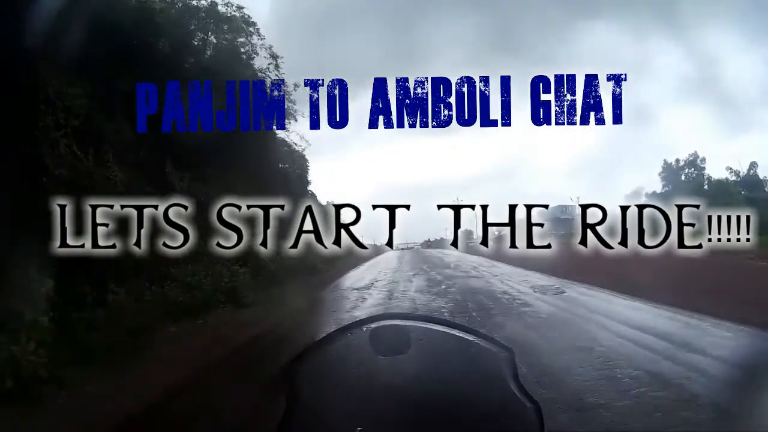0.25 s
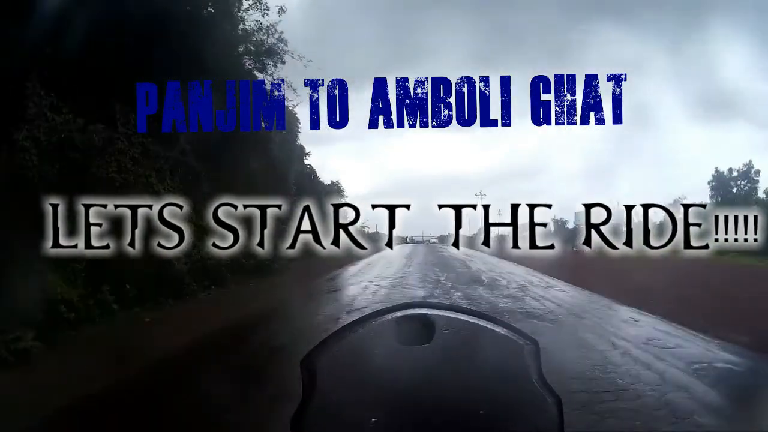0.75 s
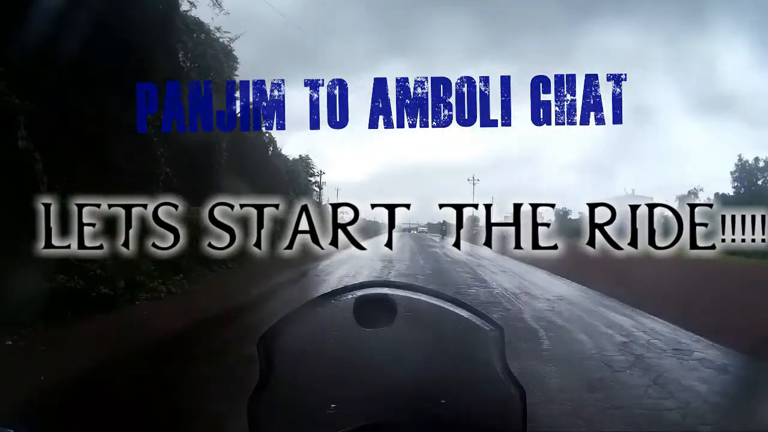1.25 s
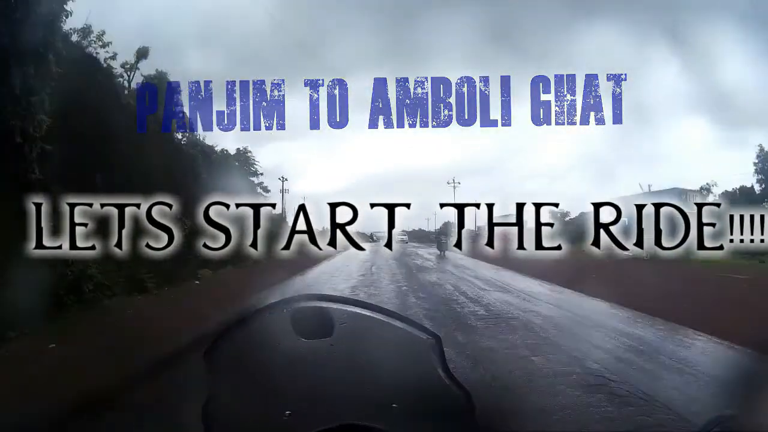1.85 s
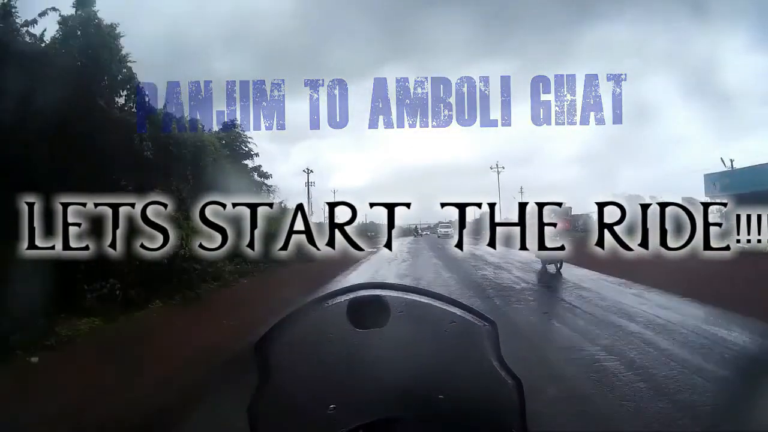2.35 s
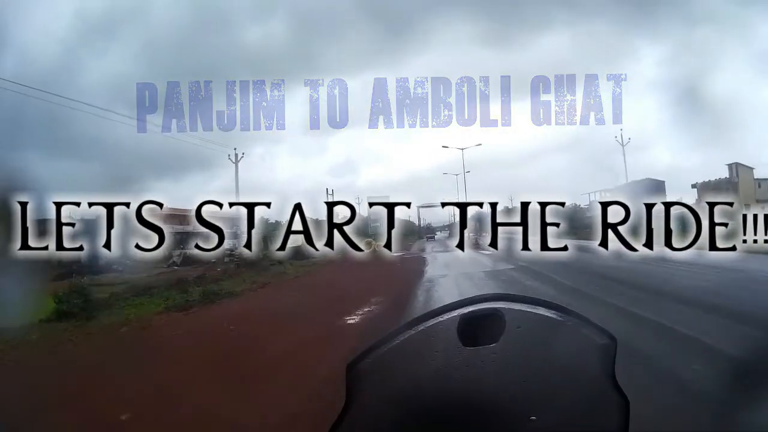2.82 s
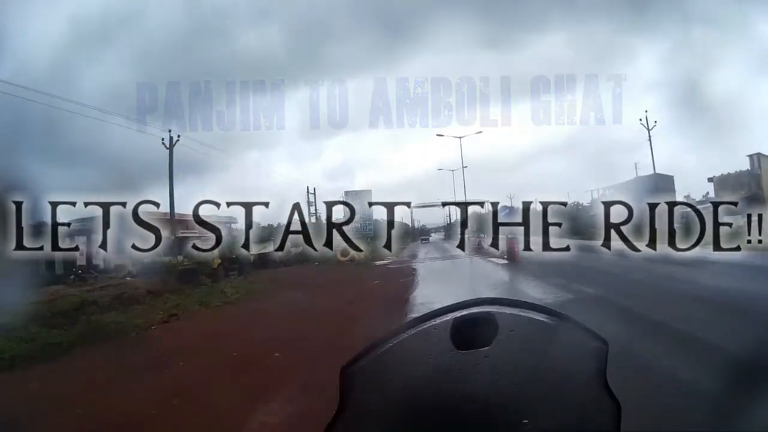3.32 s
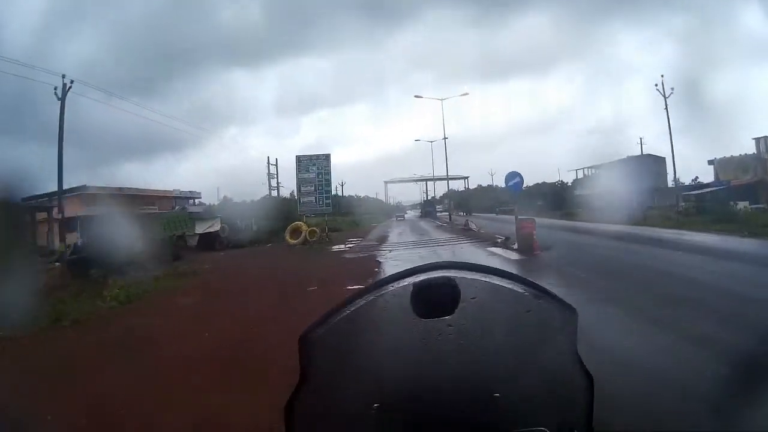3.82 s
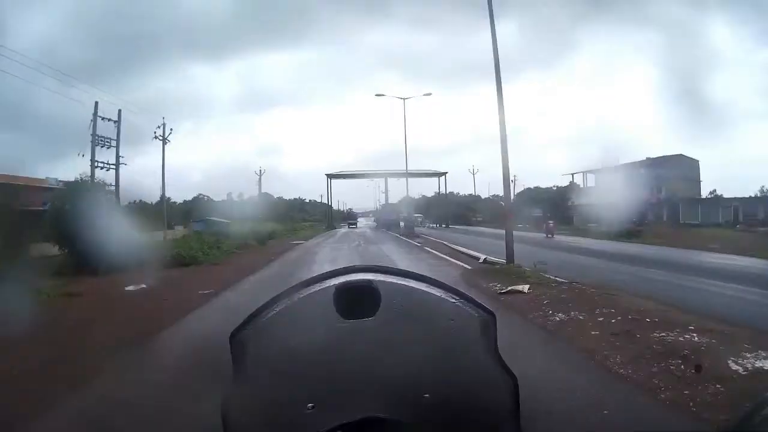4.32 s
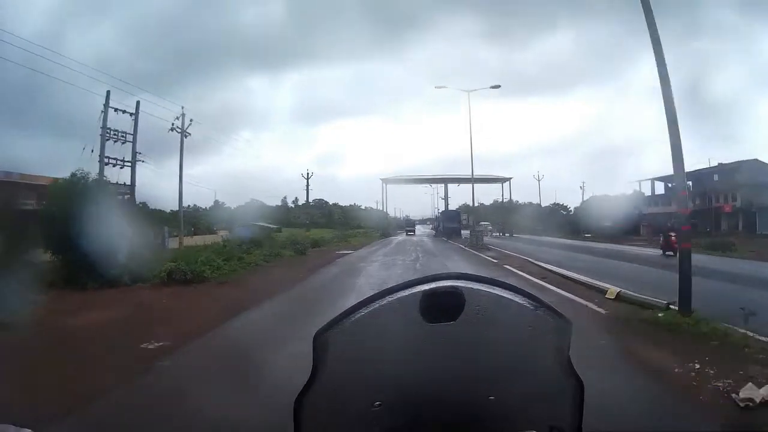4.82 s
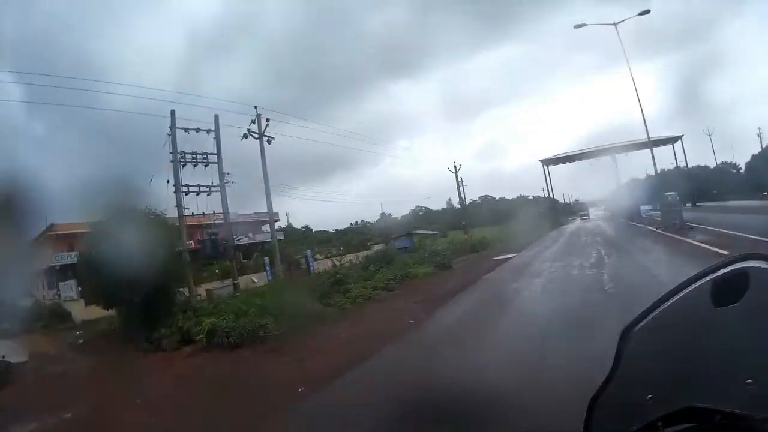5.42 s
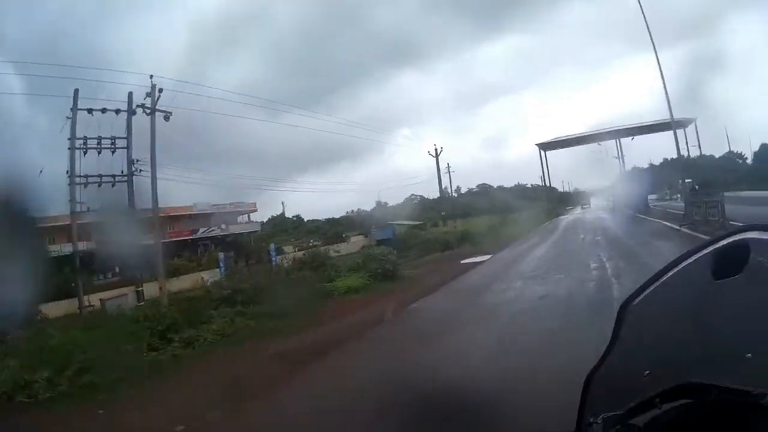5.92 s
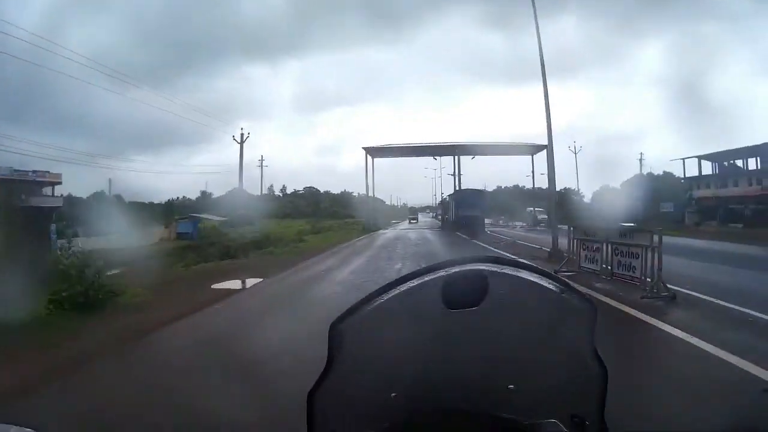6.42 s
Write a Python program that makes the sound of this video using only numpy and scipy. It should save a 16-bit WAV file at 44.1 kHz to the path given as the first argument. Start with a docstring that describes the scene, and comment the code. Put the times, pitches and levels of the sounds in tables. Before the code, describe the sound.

Loud gusting wind buffets a microphone on a motorcycle, nearly hiding the engine, then drops abruptly to quieter wet tyre hiss with sharp raindrop taps.

```python
"""Wind buffets and rushes over a camera's waterproof case on a motorcycle on a wet road, as shaped noise.
After 2.4 s the ride jumps to a slower stretch: the wind drops, and tyre spray, noise through the case's
resonances, swells near 3 s and then fades unevenly. Single raindrops tap the case as short sums of fading
sines, and fine drizzle ticks as random clicks. The wind nearly hides the engine, a sum of sine waves tied
to the turning crankshaft. The camera adds a faint hiss and cuts off the highest treble."""
import sys
import numpy as np
from scipy.fft import rfft, irfft, next_fast_len
from scipy.io import wavfile
from scipy.ndimage import map_coordinates

SR = 44100
rng = np.random.default_rng(int(sys.argv[2]) if len(sys.argv) > 2 else 0)


def log_audio(samples):
    """Write samples as a 16-bit WAV file to the path given in sys.argv[1]."""
    # one column per channel
    frames = np.atleast_2d(samples).T
    # limit to full scale, then quantise
    limited = np.clip(frames, -1, 1)
    pcm = np.round(limited * 32767).astype(np.int16)
    wavfile.write(sys.argv[1], SR, pcm)


N = 293706  # length of the sound in samples
CUT_S = 2.3835  # the ride jumps to its slow stretch at this time


def amp(db):
    """Turn decibels into a gain."""
    return 10 ** (np.asarray(db) / 20)


def unit(x):
    """Scale to an rms (average strength) of 1."""
    return x / np.sqrt(np.mean(x ** 2) + 1e-20)


def gain_along(points, hz):
    """Join (f/Hz, level/dB) points on a log frequency axis and return the gain at hz."""
    f, db = np.transpose(points)
    return amp(np.interp(np.log(hz + 1), np.log(f + 1), db))


def curves(rows):
    """Join the rows over time: one value per sample for each column after the time."""
    s, *columns = np.transpose(rows)
    t = np.arange(N) / SR
    return np.array([np.interp(t, s, column) for column in columns])


def wobble(rate):
    """A smooth random curve around zero, with rate new random values a second."""
    return map_coordinates(rng.standard_normal(2048), [np.arange(N) * rate / SR], mode="wrap")


def filtered(x, response):
    """Multiply the spectrum of x by a response that depends on frequency."""
    m = next_fast_len(N + SR // 2)  # spare room at the end for ringing
    hz = np.fft.rfftfreq(m, 1 / SR)
    return irfft(rfft(x, m) * response(hz), m)[:N]


def noise(spectrum):
    """Random noise of rms 1 with a smooth spectrum."""
    return unit(filtered(rng.standard_normal(N), lambda hz: gain_along(spectrum, hz)))


def ringing(modes, edge_hz):
    """Noise of rms 1 shaped by resonances whose powers add, fading steeply above an edge."""
    def response(f):
        power = sum(amp(db) ** 2 * (f * width) ** 2 / ((centre ** 2 - f ** 2) ** 2 + (f * width) ** 2)
                    for centre, width, db in modes)
        return np.sqrt(power / (1 + (f / edge_hz) ** 10))
    return unit(filtered(rng.standard_normal(N), response))


def causal(gain):
    """The pulse with this spectrum that comes as early as it can (minimum phase)."""
    cepstrum = irfft(np.log(np.maximum(gain, 1e-6)))
    half = len(cepstrum) // 2
    # fold the second half onto the first, so that nothing sounds before the start
    cepstrum[1:half] *= 2
    cepstrum[half + 1:] = 0
    return irfft(np.exp(rfft(cepstrum)))


def edit(before, after):
    """Jump from the fast stretch to the slow one."""
    return np.where(np.arange(N) < CUT_S * SR, before, after)


def wind():
    """Large eddies thump the mount and set it nodding; small ones rush over the case and ring it."""
    # low resonances that the buffeting shakes: f/Hz, width/Hz, relative level/dB
    mount = [(76.3, 35, 2), (99, 23, -4.5), (158, 17, -1.5), (185, 10.2, -2), (280, 39, -14.5),
             (330, 28, -18.5)]
    # smooth spectrum of the buffeting: f/Hz, relative level/dB
    buffet_spectrum = [(8, -21), (20, -14), (35, -2), (70, -8), (130, -3), (190, -4.5), (230, -13),
                       (400, -16), (900, -39), (2000, -100)]
    # smooth spectrum of the rush: f/Hz, relative level/dB
    rush_spectrum = [(100, -35), (240, -3), (390, -2.5), (580, 0.5), (820, -5), (1300, 1), (1800, -13.5),
                     (2150, -15.5), (2700, -21.5), (3300, -22.5), (3950, -27), (4750, -31), (5150, -39.5),
                     (15000, -51)]
    # resonances of the case under the airflow: f/Hz, width/Hz, relative level/dB
    shell = [(426, 34, -1), (472, 19, 1.5), (504, 14, 7.5), (680, 78, -5.5), (1107, 230, -6),
             (1280, 120, -13.5), (1374, 31, 3), (1590, 140, -10), (1918, 67, -3.5), (2190, 83, -11.5)]
    eddies = 0.5 * wobble(45) + wobble(20)  # dB, shared by the buffet and the rush
    buffet = amp(-3.0) * ringing(mount, edge_hz=383) + amp(-7) * noise(buffet_spectrum)
    open_rush = amp(-2 + wobble(14)) * noise(rush_spectrum)
    case_rush = amp(-1 + 0.6 * wobble(11.0)) * ringing(shell, edge_hz=2310)
    buffet_gain = amp(airflow() + 0.73 * eddies + 1.23 * wobble(9))
    rush_gain = amp(rush_level() + 1.2 * eddies)
    return nodding() + buffet_gain * buffet + rush_gain * (open_rush + case_rush)


def nodding():
    """The mount nods at its lowest resonances, more in strong air and most in deep gusts."""
    # deep gusts that set the mount nodding: t/s, level/dB
    gust_list = [(.76, -37), (1.47, -33), (2.24, -36.5), (2.91, -46), (6.53, -38)]
    gust_s = 0.1  # a gust swells and fades over this time
    nod_db, nod_grows = -13.5, 0.96  # level at the mean airflow, in dB; dB per dB of airflow
    air_db, t = airflow(), np.arange(N) / SR
    mean_db = air_db.mean()
    steady = amp(mean_db + nod_db + nod_grows * (air_db - mean_db) + 2.3 * wobble(6.8))
    gusts = sum(amp(db) * np.exp(-((t - s) / gust_s) ** 2) for s, db in gust_list)
    return (steady + gusts) * ringing([(24, 6.5, -23), (43.4, 8.3, -10)], edge_hz=68)


def airflow():
    """Strength of the air streaming past the camera, in dB."""
    # airflow on the fast stretch: t/s, level/dB
    fast = [(0, -29.7), (0.35, -30.5), (0.5, -29), (0.66, -31), (0.98, -28.5), (1.28, -32), (1.42, -27),
            (1.72, -30.5), (1.87, -37), (2.1, -36.5), (2.21, -30.5), (2.38, -31.5)]
    # airflow on the slow stretch: t/s, level/dB
    slow = [(2.39, -44), (2.72, -44), (2.98, -36), (3.16, -43), (3.5, -42.5), (4.02, -47.5), (4.42, -47),
            (4.6, -44.5), (5.33, -49), (5.96, -41.5), (6.66, -44)]
    return edit(curves(fast)[0], curves(slow)[0])


def rush_level():
    """The rush follows the airflow and is weaker on the slow stretch, in dB."""
    return airflow() + edit(-5.5, -10)


def tyres():
    """Spray hisses off the road and reaches the microphone through the case's resonances."""
    # tyre spray on the slow stretch, before a 4 dB cut: t/s, level/dB
    spray = [(2.39, -49.5), (2.65, -48.0), (3.03, -42.5), (3.5, -46.5), (4.1, -60), (4.48, -51),
             (5.35, -51), (5.98, -49), (6.45, -56), (6.66, -54)]
    # resonances that let outside sound into the case: f/Hz, width setting/Hz, relative level/dB
    leak = [(1095, 122, -1), (1170, 150, -14), (1351, 85, 2), (1408, 76, 0.5), (2048, 41, -8.5),
            (2136, 70, -12), (2660, 180, -31), (2900, 170, -25.5), (3470, 81, -24), (3884, 76, -22)]

    def bands(f):
        power = sum(amp(db) ** 2 / (1 + ((f - centre) / (0.7 * width)) ** 2) ** 2
                    for centre, width, db in leak)
        return np.sqrt(power)
    spray_db = edit(-50, curves(spray)[0] - 4)
    hiss = unit(filtered(rng.standard_normal(N), bands))
    return amp(spray_db + 0.6 * wobble(22)) * hiss


def raindrops(size=4096):
    """Each drop rings the shell's modes, its own pitch range most; the tap rebounds once in the case."""
    # raindrops on the case: t/s, peak level/dB, centre of the tap f/Hz, spread/octaves, splash level/dB
    drops = [(.0368, -21.5, 1700, .6, -30), (0.0969, -18, 1900, 1.05, -11), (0.0981, -12, 1070, 0.46, -30),
             (1.27, -22, 1200, .7, -35), (1.357, -29, 1918, 0.82, 2), (2.7482, -18, 1600, 1.1, -1),
             (2.8777, -11, 2330, 0.81, -14), (2.9674, -7.5, 2160, 0.9, -21.5), (3.3296, -38, 1640, .5, -35),
             (4.262, -37.5, 1110, 0.16, -47), (4.265, -33, 1780, 0.5, -38), (4.3434, -44, 2800, 0.85, -30),
             (5.7387, -20, 1510, 1.04, -16), (5.9843, -24, 2470, 0.59, -17)]
    # modes of the struck shell, before each spot varies them: f/Hz, level/dB, time to fade by 60 dB/s
    tap_modes = [(497, -2.5, 0.011), (790, -1.5, .009), (1190, -2.5, 0.027), (1354, 3, 0.024),
                 (1740, -4, 0.024), (2010, 2, 0.019), (2485, -2, 0.019), (2780, 0, 0.0056),
                 (3220, 6.5, 0.0055), (3820, -5, 0.023), (4610, -11.5, 0.017), (5650, -2.5, 0.0057),
                 (7050, -9, 0.0099), (9840, -4.5, 0.0036), (13700, -19, 0.0035)]
    out = np.zeros(N + size)
    t, hz = np.arange(size) / SR, np.fft.rfftfreq(size, 1 / SR)
    # a weak echo 3.92 ms later, duller than the tap
    rebound = 1 + 0.14 * np.exp(-2j * np.pi * hz * 0.00392) / (1 + (hz / 2600) ** 4)
    mode_hz, mode_db, t60 = np.transpose(tap_modes)[:, :, None]
    # every spot of the shell favours other modes, and the clinging water detunes them
    spots = rng.standard_normal((len(drops), 2, len(tap_modes), 1))
    # the modes swing in opposed pairs, so the tap takes a few cycles to peak
    sign = (-1) ** (np.arange(len(tap_modes))[:, None] // 2)
    # the drop's whole weight gives a dull push under the sharp contact
    push = 0.36 / (1 + (hz / 950) ** 4)
    for (s, db, centre_hz, octaves, splash_db), (favour, detune) in zip(drops, spots):
        swing = sign * np.cos(2 * np.pi * mode_hz * (1 + 0.02 * detune) * t)
        fade = np.exp(-np.log(1000) * t / t60)
        ring = np.sum(amp(mode_db + 2 * favour) * fade * swing, axis=0)
        contact = np.exp(-(np.log2((hz + 1) / centre_hz) / octaves) ** 2)
        blow = push + contact + amp(splash_db)  # the splash is equally strong at every pitch
        tap = irfft(rfft(ring) * rfft(causal(blow)) * rebound)
        out[round(s * SR):][:size] += amp(db) * tap / np.abs(tap).max()
    return out[:N]


def engine():
    """A four-stroke single fires every second turn, so its tones lie at half-multiples of crank speed."""
    # engine speed, before a random drift of about 1 %: t/s, crankshaft f/Hz
    crank = [(0, 86.24), (.5, 81.96), (1.1, 87.03), (2.15, 80), (3.3, 78.85), (5.2, 86.65), (6.66, 82.83)]
    # engine loudness, before a 3 dB cut: t/s, level/dB
    loudness = [(0, -38), (.45, -34), (1.0, -38), (1.8, -33), (2.15, -27.5), (2.42, -47), (3.3, -46.5),
                (4, -52), (5.3, -63.5), (6.2, -44), (6.66, -48.5)]
    crank_hz, level_db = curves(crank)[0], curves(loudness)[0]
    turn = 2 * np.pi * np.cumsum(crank_hz * (1 + 0.01172 * wobble(10))) / SR  # crank angle in radians
    # (multiple of crank speed, relative dB); the level of each wanders
    orders = [(.5, -14), (1, -1), (1.5, -12), (2, 0), (2.5, -16), (3, -15), (6, -14)]
    tone = sum(amp(db + 4.96 * wobble(18)) * np.sin(k * turn + rng.uniform(0, 2 * np.pi))
               for k, db in orders)
    return amp(level_db - 3) * unit(tone)


def drizzle(count=700):
    """Fine droplets tick faintly on the case at random times, louder as the airflow grows."""
    when, strength = rng.random(count), rng.exponential(size=count)
    hits = np.bincount((when * N).astype(int), amp(3.8 * np.minimum(strength, 2.5)), N)
    # (Hz, relative dB)
    colour = [(300, -7), (1200, 9.0), (2000, -9), (3800, -5), (5000, -29.5), (15000, -46)]
    ticks = unit(filtered(hits, lambda hz: gain_along(colour, hz)))
    return amp(rush_level() + edit(-16.5, -13)) * ticks


def scene():
    """Add all sources at the one microphone."""
    return (wind() + tyres() + engine() + raindrops() + drizzle())[None]


def record(dry):
    """The camera adds its own hiss and keeps nothing above its band limit."""
    # smooth spectrum of the camera's hiss: f/Hz, relative level/dB
    hiss_spectrum = [(100, 4.5), (3000, 7), (4500, 3), (5500, 1), (10000, -1), (14000, -4), (16000, -12)]
    top_hz = 15760  # the band limit
    heard = dry[0] + amp(-68.5) * noise(hiss_spectrum)
    return filtered(heard, lambda hz: hz < top_hz)[None]


dry = scene()
out = record(dry)
log_audio(out)
```